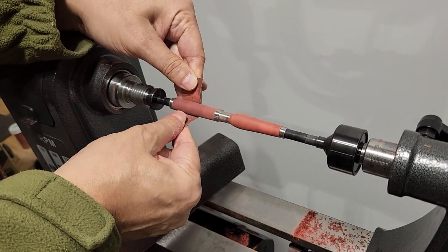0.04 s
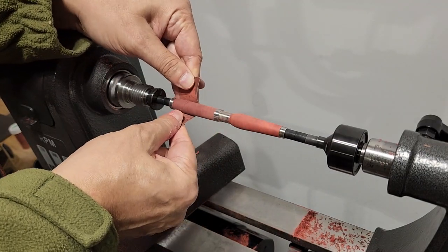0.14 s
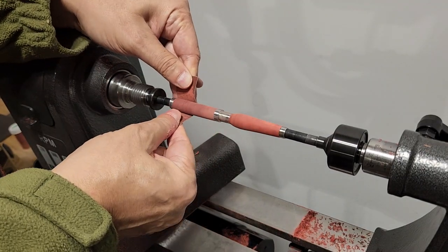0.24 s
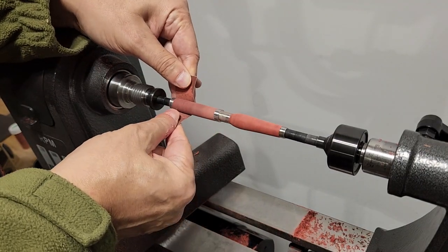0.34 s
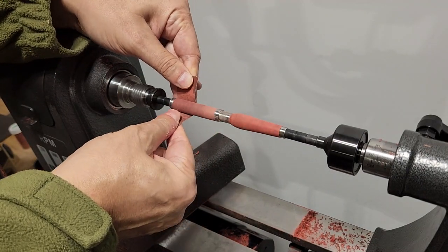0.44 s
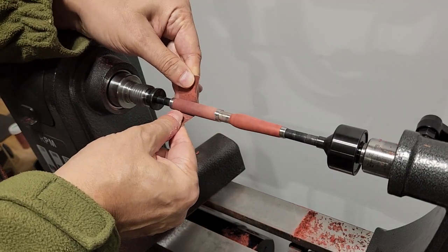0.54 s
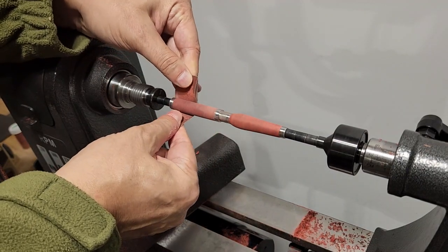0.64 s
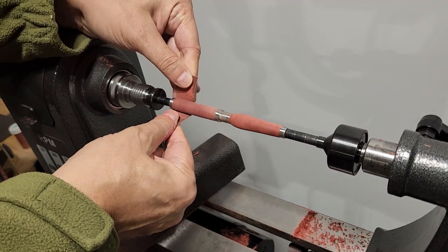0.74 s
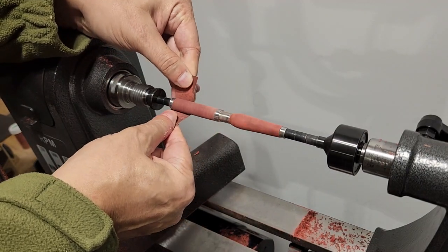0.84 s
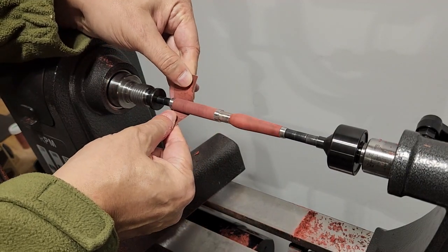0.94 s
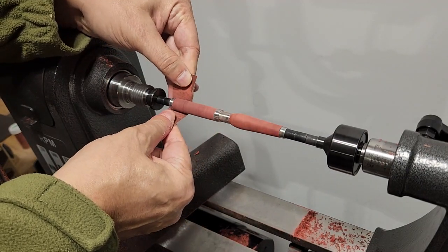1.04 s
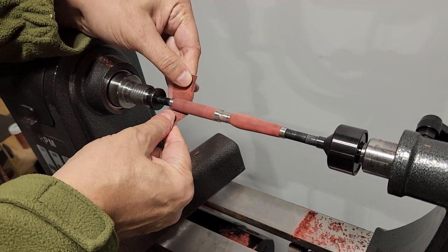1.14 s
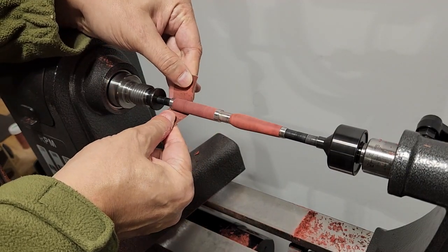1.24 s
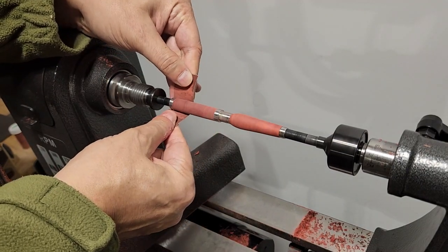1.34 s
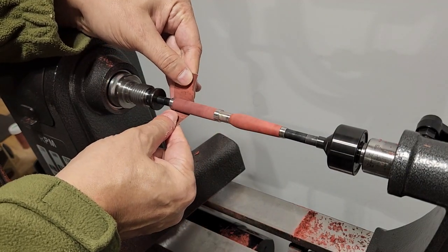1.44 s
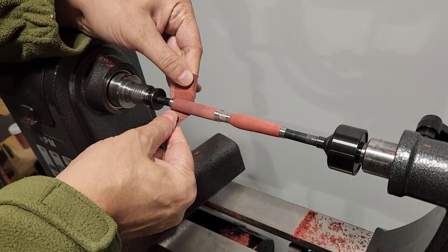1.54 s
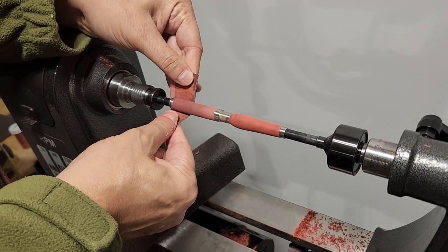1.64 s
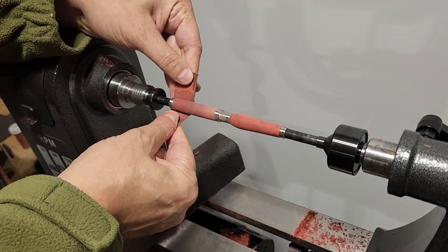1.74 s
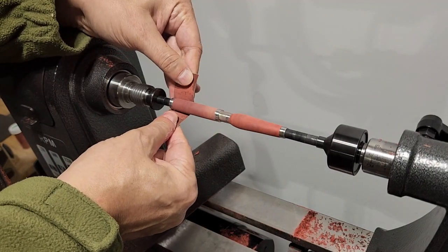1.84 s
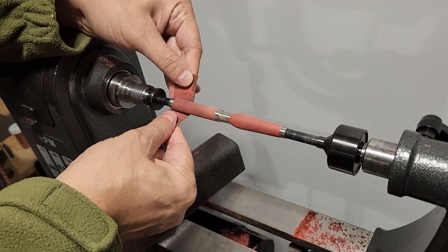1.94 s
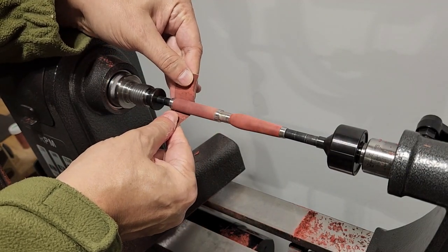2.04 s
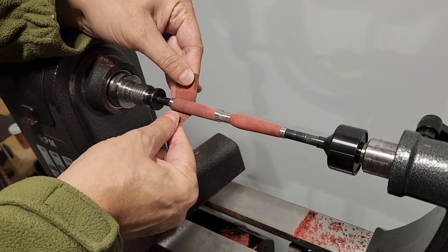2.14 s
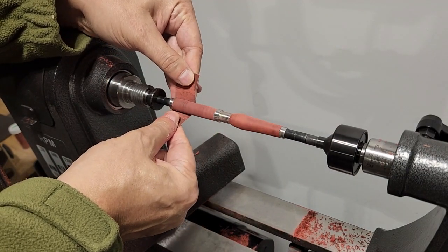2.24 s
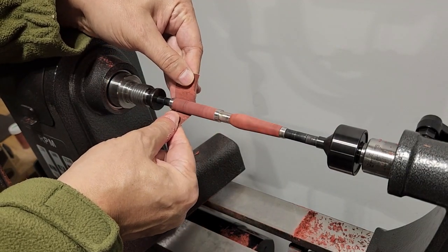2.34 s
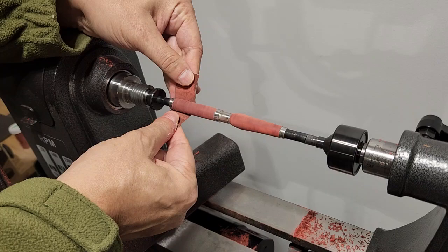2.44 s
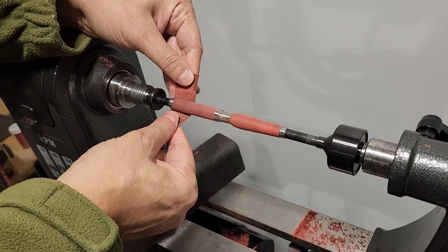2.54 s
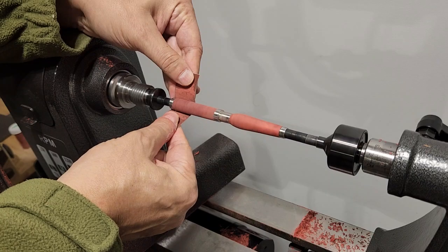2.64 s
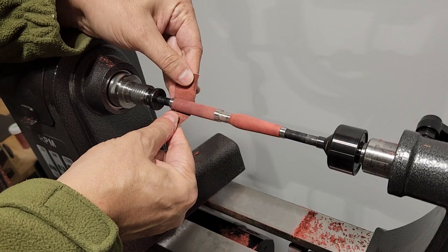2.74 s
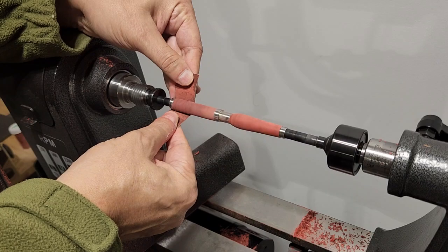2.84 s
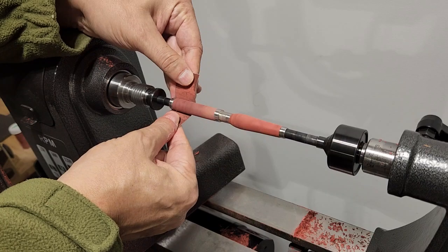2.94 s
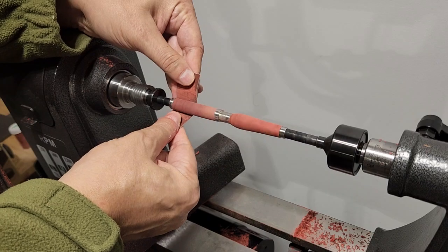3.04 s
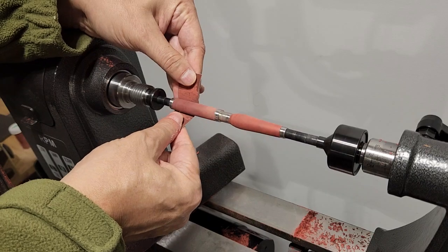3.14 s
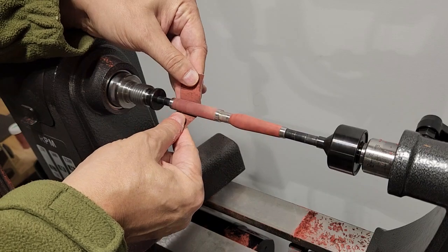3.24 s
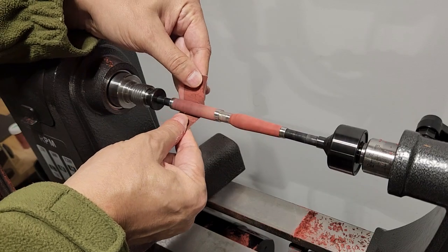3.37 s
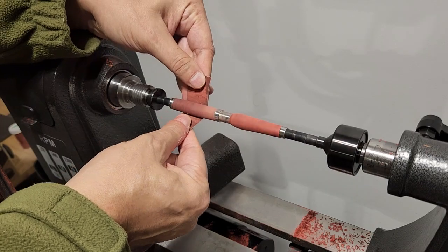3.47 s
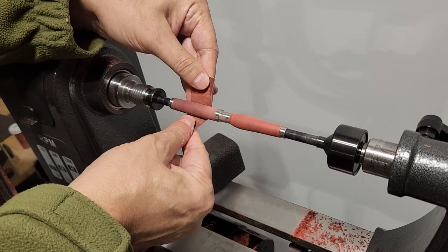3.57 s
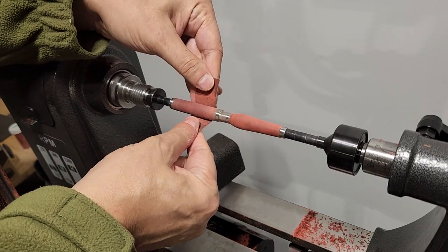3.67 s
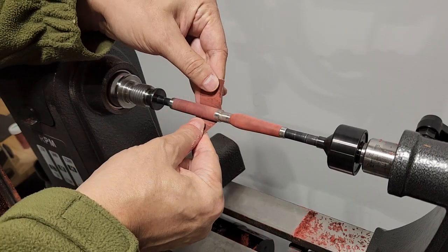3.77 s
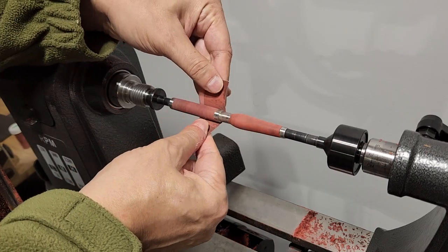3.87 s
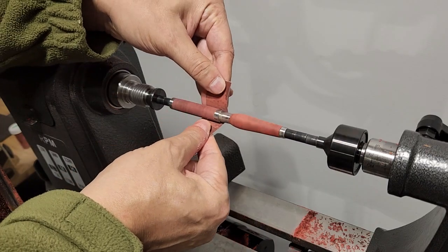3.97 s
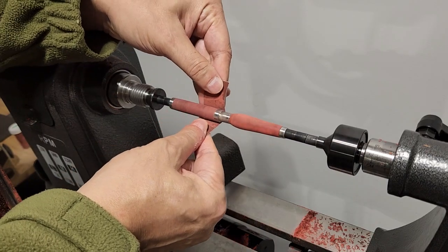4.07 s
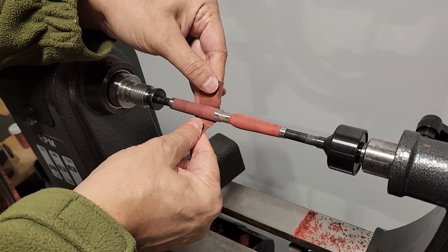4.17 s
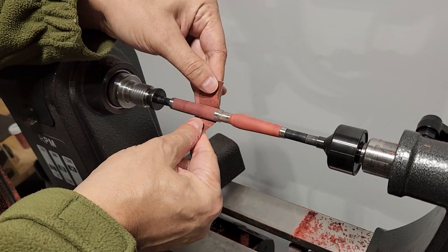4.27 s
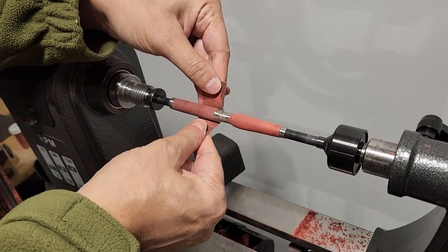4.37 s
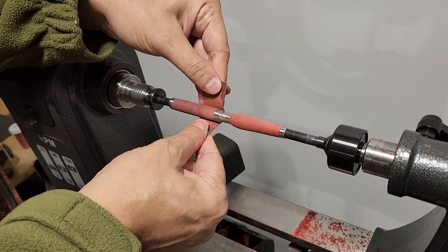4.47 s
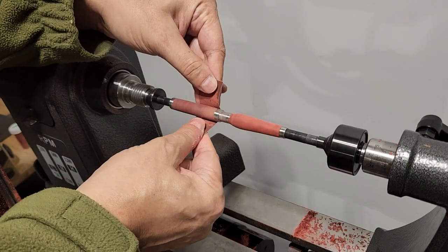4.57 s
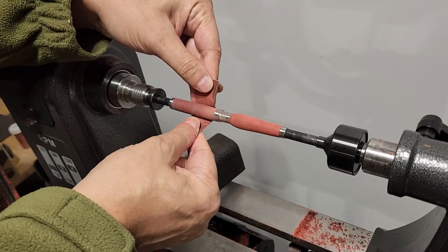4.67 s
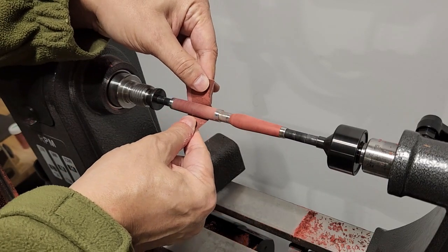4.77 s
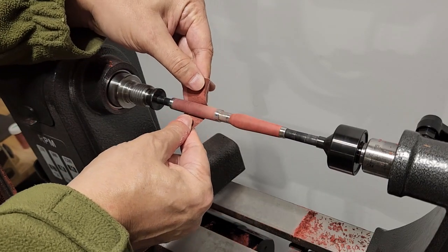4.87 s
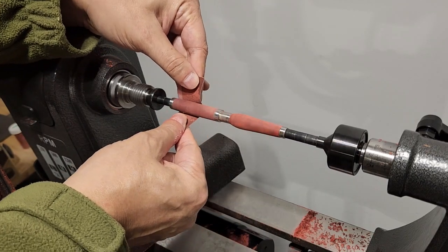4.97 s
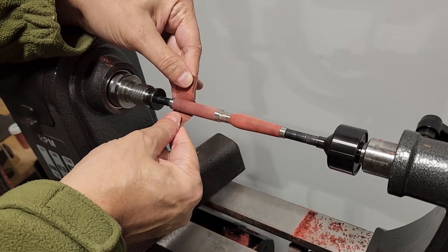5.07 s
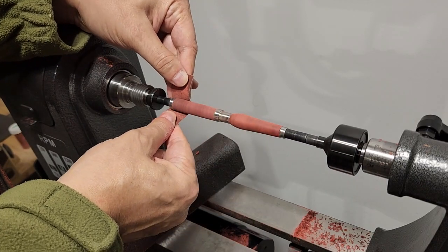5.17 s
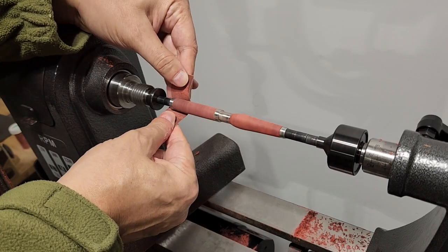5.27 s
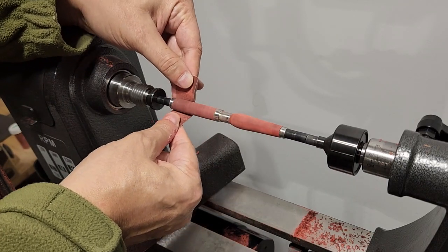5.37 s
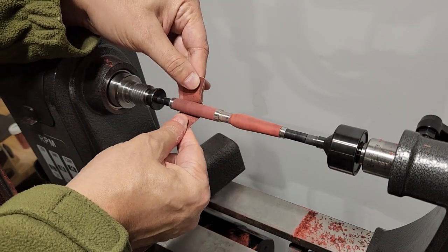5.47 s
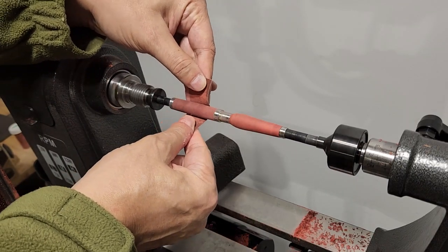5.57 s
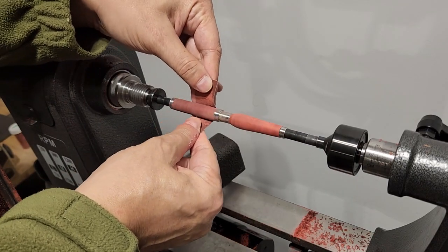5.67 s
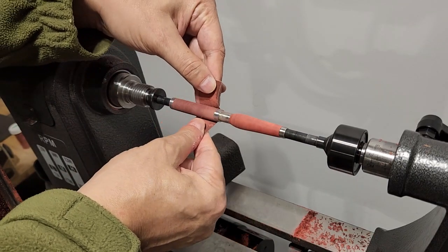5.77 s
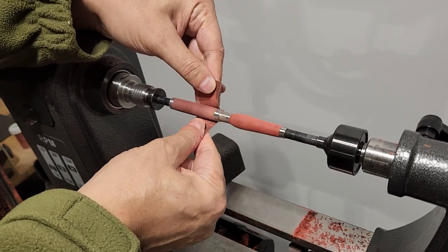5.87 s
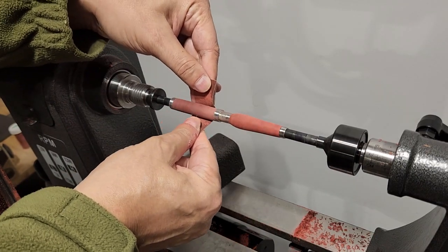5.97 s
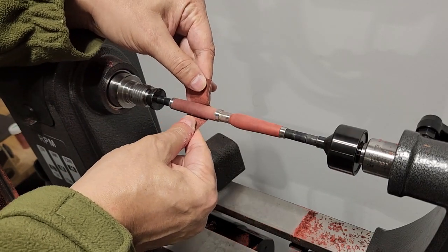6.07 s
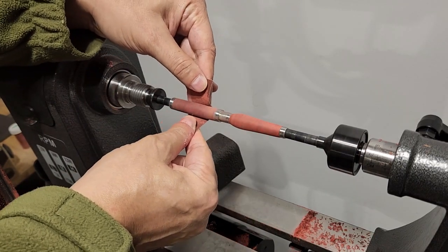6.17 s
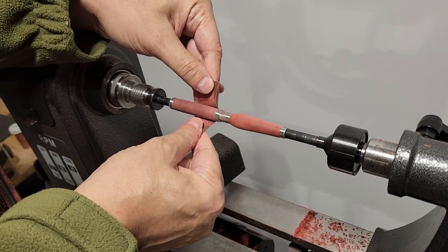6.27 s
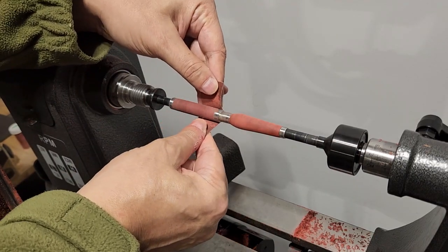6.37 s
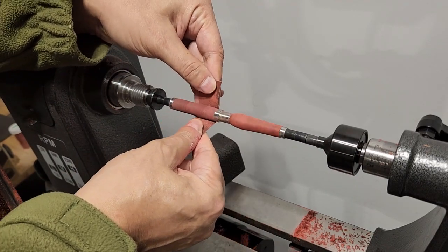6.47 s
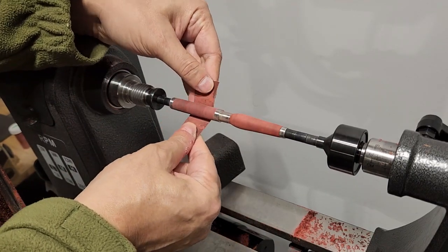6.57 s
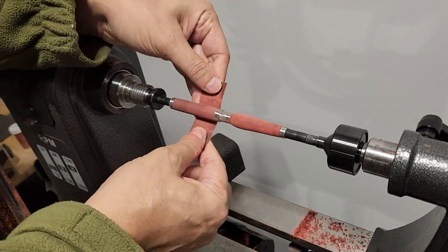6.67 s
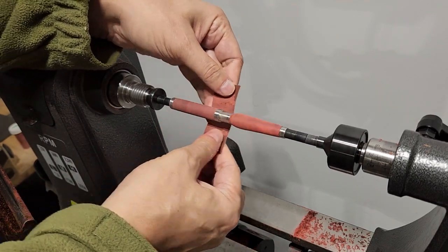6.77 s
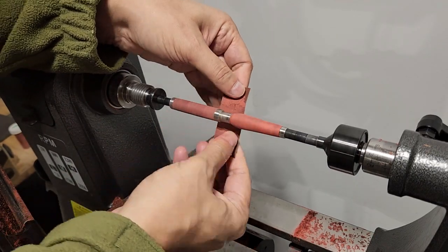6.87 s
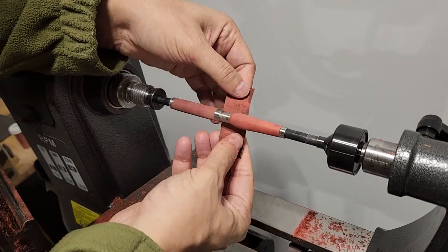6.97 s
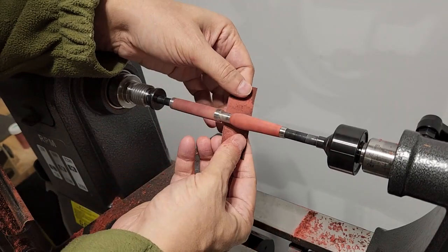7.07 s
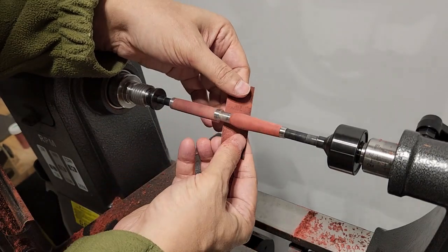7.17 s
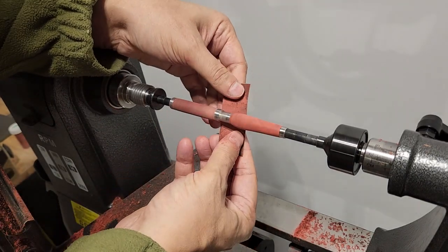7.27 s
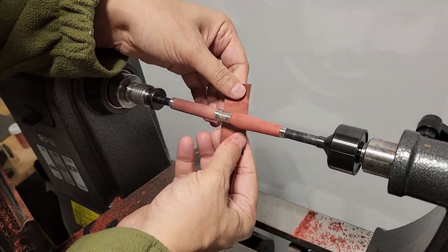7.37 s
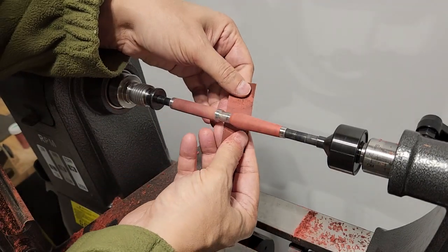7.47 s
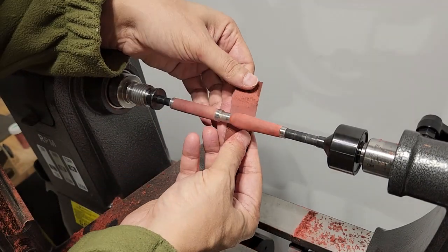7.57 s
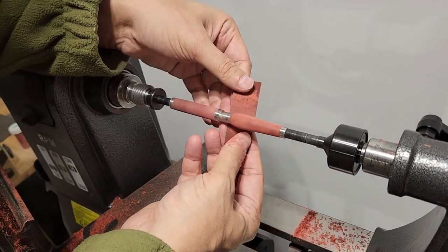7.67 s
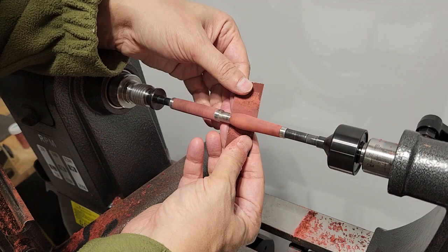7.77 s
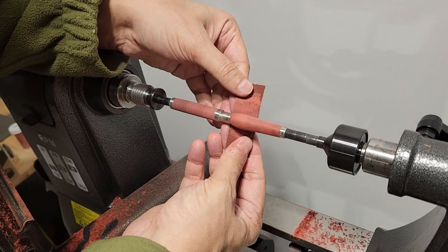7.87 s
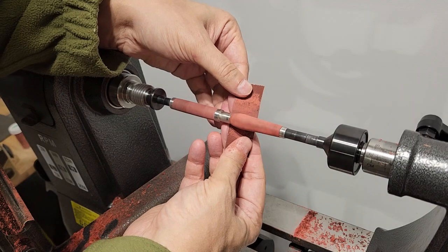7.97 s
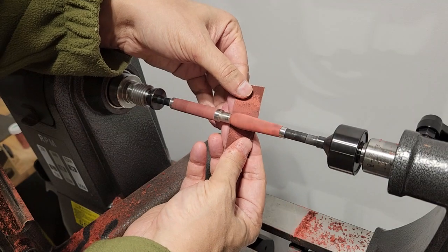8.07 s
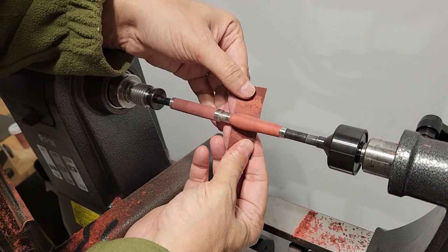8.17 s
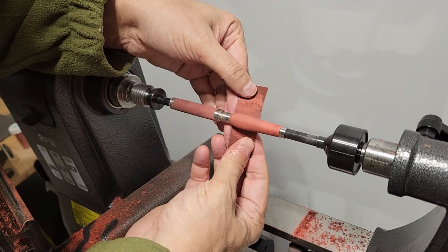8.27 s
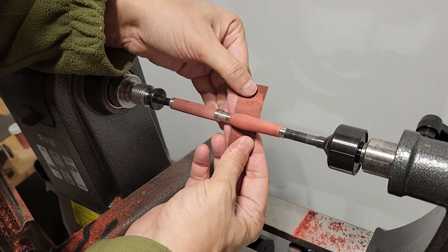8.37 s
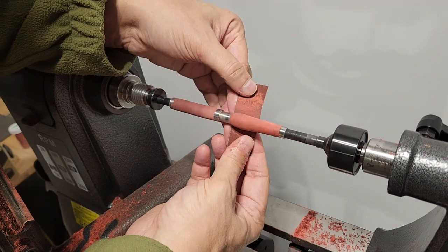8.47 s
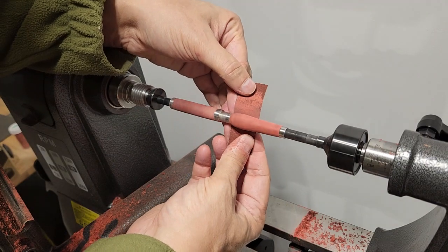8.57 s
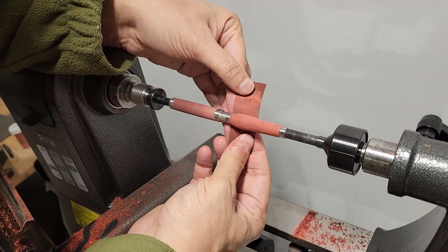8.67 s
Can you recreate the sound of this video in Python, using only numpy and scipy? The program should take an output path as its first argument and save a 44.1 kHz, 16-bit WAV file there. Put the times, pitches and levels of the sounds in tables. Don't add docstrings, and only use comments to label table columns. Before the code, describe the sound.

Close, wide sanding hiss rides a humming, ringing lathe motor; the paper lifts away, clicks a few times, and settles back more dully.

```python
import sys
import numpy as np
from scipy import signal
from scipy.fft import rfft, irfft, next_fast_len
from scipy.io import wavfile
from scipy.ndimage import uniform_filter1d, map_coordinates

SR = 44100
rng = np.random.default_rng(int(sys.argv[2]) if len(sys.argv) > 2 else 0)


def generate_wav(signal):
    frames = np.transpose(np.atleast_2d(signal))
    scaled = np.clip(frames, -1, 1) * 32767
    pcm = np.round(scaled).astype(np.int16)
    wavfile.write(sys.argv[1], SR, pcm)


def magnitude_from_level(level_db):
    exponent = np.asarray(level_db, float) / 20
    return 10 ** exponent


N = 384552
TIME = np.arange(N) / SR

# pitch_hz, level_db (per Hz)
RUMBLE_SPECTRUM = [(15, -38), (25, -12), (64, -2), (114, -12.5), (179, -6), (449, -14.5), (798, -2.5),
                   (885, 0), (1020, -6.5), (1130, 0), (1600, -8), (2080, -52), (3520, -120)]
WHIRR_SPECTRUM = [(940, -50), (1600, -7.5), (1740, -1.5), (1980, -12), (2280, -6), (2880, -11.5),
                  (3910, -22), (4920, -19.5), (6630, -20), (8600, -20.5), (11300, -36), (12300, -25),
                  (15900, -40)]
# pitch_hz, likeness (0-1)
WHIRR_LIKENESS = [(60, 0.99), (130, 0.97), (290, 0.83), (640, 0.93), (1410, 0.041), (3100, 0.055),
                  (6820, 0.02), (15000, 0.01)]
# pitch_hz, left_minus_right_db
WHIRR_LEAN = [(60, 3.5), (110, -11), (200, 8), (380, -3), (700, 0.5), (1290, 3), (2380, 3.5), (4400, 10),
              (8120, -2), (15000, 21)]

# multiple, level_db
SHAFT_TONES = [(1, -54.5), (3, -62.5), (4, -69.5), (5, -72.5), (12, -70), (13, -69)]
# pitch_hz, width_hz, level_db
CASING_MODES = [(334.3, 32, -65), (382, 25, -68), (419, 37, -66.5), (512.6, 57, -63), (540, 6.7, -65),
                (762, 22, -81), (1230, 50, -61), (1345, 40, -65.5), (1444, 34, -62.5), (1911, 13, -71.5),
                (2048, 150, -63.5), (840, 7.5, -76), (1394, 26, -83)]
SHAFT_HZ, SPINDLE_HZ = 58.17, 18.5

# pitch_hz, width_hz, level_db
LOW_MODES = [(870, 12.8, -2.5), (873, 5, -1), (899.7, 16.5, -7.5)]
HIGH_MODES = [(1135, 11.5, 3.5), (1132, 14.4, -1)]
# rate_hz, depth
# (0-1), first_crest_s
LOW_BEATS = [(1.52, 0.2, 0.612), (2.75, 0.27, 0.099), (3.8, 0.31, 0.085), (5.42, 0.42, 0.071),
             (7.55, 0.18, 0.03), (8.61, 0.18, 0.04), (9.22, 0.26, 0.076), (10.78, 0.18, 0.058),
             (11.37, 0.28, 0.056), (13.0, 0.18, 0.049), (14.05, 0.19, 0.055), (14.61, 0.19, 0.065),
             (16.79, 0.27, 0.001), (22.21, 0.23, 0.019)]
HIGH_BEATS = [(0.1, 0.31, 2.565), (1.6, 0.18, 0.08), (2.19, 0.14, 0.368), (3.17, 0.34, 0.029),
              (3.27, 0.16, 0.076), (3.82, 0.22, 0.121), (5.26, 0.21, 0.123), (7.64, 0.24, 0.078),
              (9.25, 0.24, 0.105), (10.82, 0.3, 0.058), (13.04, 0.23, 0.007), (14.63, 0.28, 0.009),
              (16.22, 0.38, 0.014), (20.04, 0.13, 0.024)]
LOW_DB, HIGH_DB, BEAT_DB = -55.5, -54.5, 4
LOUDER_S, LOUDER_DB = 7.6, 2

# start_s, peak_db, pitch_hz, start_angle_radians
THUMPS = [
    (3.248, -53, 48, .3),
    (3.81, -50, 62, 2.6),
    (3.83, -57, 104, .3),
    (5.16, -49, 50, .3),
]
# start_s, peak_db
TICKS = [
    (7.102, -44),
    (7.152, -39),
    (7.208, -50),
    (7.2694, -52),
    (7.4394, -48),
    (7.6344, -51),
    (7.8311, -41),
]

# time_s, scratch_db, hiss_over_scratch_db
FIRST_PASS = [(0, -49.5, 10), (.2, -49.5, 7), (.7, -50, 6.5), (1.1, -49.5, 6), (1.6, -49, 6),
              (2.06, -51.5, 7), (2.2, -48, 6), (2.85, -50.5, 7.5), (3.27, -45.5, 4), (3.65, -48.5, 7),
              (4.15, -45.5, 5.5), (4.36, -49, 8.5), (4.64, -46, 7), (4.9, -50, 7.5), (5.5, -47.5, 5),
              (6.03, -48, 9), (6.2, -49, 6), (6.55, -49, 9.5)]
LIFT = [
    (6.635, -52.5, 14),
    (6.655, -51.5, 6.5),
    (6.73, -56, 10.5),
    (6.82, -74.5, -10),
    (7.81, -72, -11),
]
SECOND_PASS = [
    (7.87, -55, -2),
    (7.94, -59, -0.5),
    (8.2, -56, -3),
    (8.24, -61.5, -3),
    (8.28, -52, -6),
    (8.55, -50, -1),
    (8.72, -50.5, -3),
]
# start_s, length_s, scratch_change_db, hiss_change_db
EASES = [
    (1.133, .27, 1, -4.5),
    (5.287, 0.132, -1.5, -2.5),
]
# start_s, length_s, level_db
GRAZES = [
    (7.095, 0.11, -63),
    (7.142, 0.017, -61),
    (7.214, 0.023, -65),
    (7.263, 0.016, -63.5),
    (7.428, .04, -74),
    (7.62, 0.037, -75),
]
GRAZE_HISS_DB, EDGE_S = -2, 0.01

# time_s, place (0 head, 1 middle, 2 far half)
PLACE = [(0, .05), (.6, .17), (1, .08), (1.5, .2), (2, .1), (3.03, .15), (3.09, .72), (3.9, .88),
         (5.02, .95), (5.08, .2), (5.58, .08), (5.65, .96), (6.5, .9), (6.65, .5), (6.8, 1.95),
         (8.72, 1.95)]
# start_s, length_s
ROCKS = [
    (4.266, 0.027),
    (4.778, 0.023),
    (5.71, 0.017),
    (6.323, 0.017),
    (6.516, 0.068),
]
ROCK_BACK = 0.74
TREMBLE = 0.059

# pitch_hz, level_db (per Hz)
HEAD_GRIT = [(1500, -7.5), (2050, 5), (2600, -6), (3300, -3.5), (4150, -3), (4450, 5.5), (5050, 3.5),
             (5600, -2.4), (6500, -2.5), (7400, 0), (8300, -4), (10900, -2.5), (13300, 1.5), (15600, 3.5)]
MIDDLE_GRIT = [(1500, -1.5), (2050, -0.5), (2600, -5), (3300, 0), (4300, -2.1), (5600, -1.5), (6500, -8.5),
               (7400, 2), (8300, -3.5), (10900, -2.5), (11700, 0), (12400, -1), (13300, -0.5), (15600, 4.5)]
FAR_GRIT = [(1500, -6), (2400, -8.5), (3300, -5), (4700, -7), (5600, -3), (6500, -7), (7400, -7.5),
            (8300, -16.5), (9500, -14), (10900, -18.5), (11700, -13.5), (13300, -12), (15000, -7),
            (15600, -6)]
# pitch_hz, left_minus_right_db, likeness (0-1), left_lead_radians
HEAD_PATHS = [(1500, 1, .15, 1.2), (3300, 3.5, .45, 1.6), (4050, .6, .65, 2.8), (4350, 0, .96, 3.14),
              (5050, 0, .95, 3.14), (5500, -3.5, .35, -2.9), (6500, 3, .4, -.5), (7400, 2.5, .35, -2.7),
              (8300, 1.7, .15, .3), (10900, 3, .1, -1), (11700, 3.4, .5, -2.9), (13300, 6, .43, -3.1),
              (15600, 12.5, .4, -2.3)]
MIDDLE_PATHS = [(1500, 1, .3, .6), (3300, 1.3, .33, 1.2), (4150, -.4, .6, 2.8), (5050, -.3, .62, 2.9),
                (5600, -1.4, .55, 3), (6500, 1.2, .16, -1.5), (7400, .8, .37, -2.3), (8300, -.4, .05, 3.1),
                (9500, 5, .1, -1), (10900, 3, .28, .5), (11700, 6.8, .44, .5), (13300, 7.2, .4, 1.7),
                (15600, 12, .42, 2.4)]
FAR_PATHS = [(1500, 3, .2, .2), (2400, -3, .1, -1.3), (3300, -.3, .43, .9), (4800, -2.5, .45, 1.4),
             (5600, .3, .42, 1.3), (6500, -5.5, .24, 1.3), (7400, -4, .45, -2.5), (8300, .4, .36, 2.7),
             (9500, 4, .26, -1.2), (10900, 6, .28, -2.5), (13300, 1.5, .44, -2.9), (15600, 3.6, .34, -2.7)]

TOP_HZ = 15740


def unit(x):
    return x / np.sqrt(np.mean(x ** 2) + 1e-20)


def columns(rows, at):
    first, *rest = np.transpose(rows)
    return [np.interp(at, first, column) for column in rest]


def along(points, hz):
    rows = [(np.log(row[0] + 1), *row[1:]) for row in points]
    return columns(rows, np.log(hz + 1))


def wobble(rate):
    return map_coordinates(rng.standard_normal(400 * 10), [TIME * np.clip(rate, .1, 400)])


def window(s, length):
    from_edge = np.minimum(TIME - s, s + length - TIME)
    return np.clip(from_edge / EDGE_S + .5, 0, 1)


def filtered(x, response):
    size = next_fast_len(N + 8192)
    return irfft(rfft(x, size) * response(np.fft.rfftfreq(size, 1 / SR)), size)[..., :N]


def patchy(x, depth_db, bins, frames):
    z = signal.stft(x, nperseg=512)[2]
    field = uniform_filter1d(rng.standard_normal(z.shape[1:]), size=bins, axis=0)
    field = uniform_filter1d(field, size=frames, axis=1)
    return signal.istft(z * magnitude_from_level(depth_db * unit(field)), nperseg=512)[1][..., :N]


def ports(pair, left_db, right_db, alike):
    size = np.clip(abs(alike), 0, .99)
    shared = np.exp(-1j * np.angle(alike)) * size * pair[0]
    right = shared + np.sqrt(1 - size ** 2) * pair[1]
    return np.array([magnitude_from_level(left_db) * pair[0], magnitude_from_level(right_db) * right])


def rush(spectrum):
    hz = np.fft.rfftfreq(N, 1 / SR)
    level, = along(spectrum, hz)
    alike, = along(WHIRR_LIKENESS, hz)
    lean, = along(WHIRR_LEAN, hz)
    source = rfft(rng.standard_normal((2, N)))
    noise = irfft(ports(source, level + lean / 2, level - lean / 2, alike), N)
    return unit(patchy(noise, depth_db=0.5, bins=3, frames=30))


def whirr():
    low = magnitude_from_level(-52 + 0.4 * wobble(6.8)) * rush(RUMBLE_SPECTRUM)
    broad = magnitude_from_level(-60.0 + 0.62 * wobble(7.2)) * rush(WHIRR_SPECTRUM)
    return low + broad


def tone(hz, lead, lean_db):
    phase = 2 * np.pi * (np.cumsum(hz * np.ones(N)) / SR + rng.random())
    side = np.array([[.5], [-.5]])
    return np.sqrt(2) * magnitude_from_level(lean_db * side) * np.sin(phase + lead * side)


def casing():
    total = 0
    for hz, width, db in CASING_MODES:
        pair = rng.standard_normal((2, N))
        noise = np.array([pair[0] + .6 * pair[1], pair[0] - 0.52 * pair[1]])
        mode = filtered(noise, lambda f: 1 / (1 + ((f - hz) / (width / 2)) ** 2))
        total = total + magnitude_from_level(db) * unit(mode)
    return total


def motor():
    speed = SHAFT_HZ + 0.053 * wobble(2.0)
    hum = 0
    for order, db in SHAFT_TONES:
        level = magnitude_from_level(db + 0.82 * np.sqrt(order) * wobble(8))
        hum = hum + level * tone(order * speed, 0.039 * order, 0.42)
    whistle = magnitude_from_level(-80.5 + 3 * wobble(5)) * tone(11999, .3, 3)
    return hum + whistle + casing()


def ringing(modes, beats, level_db, lean_db, alike):
    hz = np.fft.rfftfreq(N, 1 / SR)
    response = sum(magnitude_from_level(db) / (1 + 2j * (hz - centre) / width) ** 2 for centre, width, db in modes)
    source = rfft(rng.standard_normal((2, N)))
    ring = irfft(ports(source, lean_db / 2, -lean_db / 2, alike) * response, N)
    power = uniform_filter1d(ring.mean(0) ** 2, size=1500)
    swell = np.sqrt(abs(uniform_filter1d(power, size=1500)))
    shake = sum(depth * np.cos(2 * np.pi * rate * (TIME - s)) for rate, depth, s in beats)
    return magnitude_from_level(level_db + 3.5 + BEAT_DB * shake) * ring / (swell + 0.28 * np.std(ring))


def frame():
    low_level = LOW_DB + LOUDER_DB * window(LOUDER_S, 10)
    low = ringing(LOW_MODES, LOW_BEATS, low_level, 4.6, 0.58 * np.exp(.8j))
    high = ringing(HIGH_MODES, HIGH_BEATS, HIGH_DB, -4.1, 0.73 * np.exp(.6j))
    return low + high


def thumps():
    out, t = np.zeros(N), np.arange(SR // 4) / SR
    for s, db, hz, angle in THUMPS:
        swing = np.sin(2 * np.pi * hz * t + angle)
        fade = magnitude_from_level(db + 6.5 - 60 * t / 0.27) * (1 - np.exp(-t / .015))
        out[round(s * SR):][:len(t)] += fade * swing
    return out


def ticks():
    out, t = np.zeros((2, N)), np.arange(SR // 20) / SR
    for s, db in TICKS:
        start = round(s * SR)
        rustle = rng.standard_normal((2, len(t))) * magnitude_from_level(db - 7 - 60 * t / .008)
        snap = magnitude_from_level(db + 6 - 60 * t / .0015)
        out[:, start:start + len(t)] += rustle - snap
    return filtered(out, lambda hz: (1j * hz / (600 + 1j * hz)) ** 2)


def hands():
    scratch_db, hiss_db = columns(FIRST_PASS + LIFT + SECOND_PASS, TIME)
    for s, length, scratch_change, hiss_change in EASES:
        eased = window(s, length)
        scratch_db = scratch_db + scratch_change * eased
        hiss_db = hiss_db + hiss_change * eased
    graze = sum(magnitude_from_level(db) * window(s, length) for s, length, db in GRAZES)
    rocked = sum(window(*row) for row in ROCKS)
    place = columns(PLACE, TIME)[0] * (1 - ROCK_BACK * rocked) + TREMBLE * wobble(8)
    scratch = magnitude_from_level(scratch_db) + graze
    hiss = magnitude_from_level(scratch_db + hiss_db) + magnitude_from_level(GRAZE_HISS_DB) * graze
    return scratch, hiss, place


def echoes(t60):
    cluster = rng.standard_normal(SR // 20) * magnitude_from_level(-60 * TIME[:SR // 20] / t60)
    return rfft(cluster / np.linalg.norm(cluster), N)


def grit(source, spectrum, paths):
    hz = np.fft.rfftfreq(N, 1 / SR)
    near = source[0] * (1 + .3 * echoes(.022))
    extra = 0.88 * near * echoes(0.079) + 0.69 * source[1]
    level, = along(spectrum, hz)
    turned = [(f, lean, alike * np.cos(lead), alike * np.sin(lead)) for f, lean, alike, lead in paths]
    lean, real, imag = along(turned, hz)
    heard = ports([near, extra], level + lean / 2, level - lean / 2, real + 1j * imag)
    heard = heard * (hz / 1300) ** 2 / (1 + (hz / 1300) ** 2)
    upper = np.clip((hz - 7800) / 900, 0, 1)
    parts = [irfft(heard * share, N) for share in (1 - upper, upper)]
    return np.array([part / np.std(part.mean(0)) for part in parts])


def paper():
    pressure, brightness, place = hands()
    places = ((HEAD_GRIT, HEAD_PATHS), (MIDDLE_GRIT, MIDDLE_PATHS), (FAR_GRIT, FAR_PATHS))
    scratch = hiss = 0
    for k, place_tables in enumerate(places):
        grains = rng.standard_normal((2, N)) * magnitude_from_level(2.0 * rng.standard_normal(N))
        nearness = np.sqrt(np.clip(1 - abs(np.clip(place, 0, 2) - k), 0, 1))
        low, high = nearness * grit(rfft(grains), *place_tables)
        scratch, hiss = scratch + low, hiss + high
    turn = .45 * np.sin(2 * np.pi * SPINDLE_HZ * TIME)
    flutter = turn + 0.46 * wobble(6.5) + .5 * wobble(40)
    rub = pressure * magnitude_from_level(1.0 + flutter) * scratch
    rub = rub + brightness * magnitude_from_level(5.5 + flutter + 0.31 * wobble(18)) * hiss
    drifting = patchy(rub, depth_db=1.22, bins=2, frames=120)
    return patchy(drifting, depth_db=1.24, bins=6, frames=10)


def scene():
    return whirr() + motor() + frame() + thumps() + ticks() + paper()


def band_limit(x):
    return signal.sosfilt(signal.butter(12, 17110, fs=SR, output="sos"), x)


def record(dry):
    limited = filtered(dry, lambda hz: (hz < TOP_HZ) + magnitude_from_level(-22) * (hz >= TOP_HZ) * (hz < TOP_HZ + 130))
    return band_limit(limited)


dry = scene()
out = record(dry)
generate_wav(out)
```